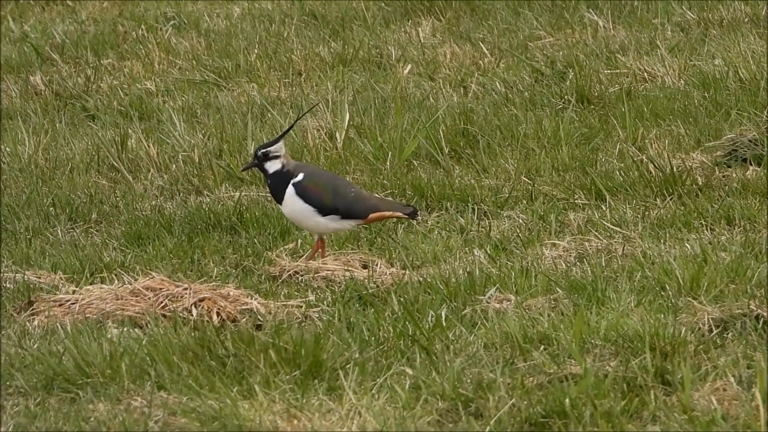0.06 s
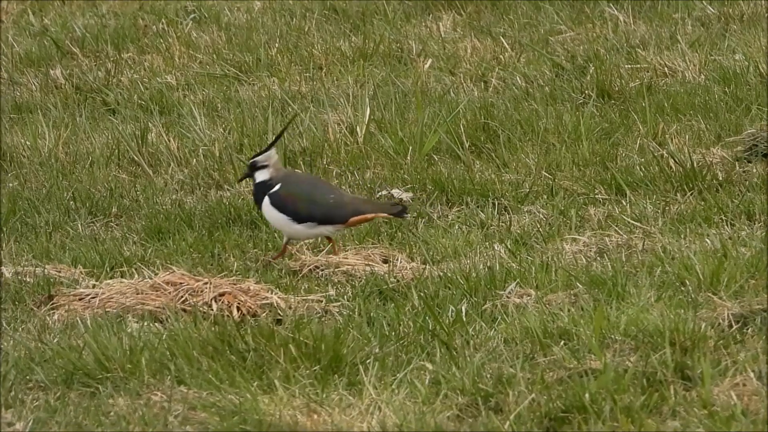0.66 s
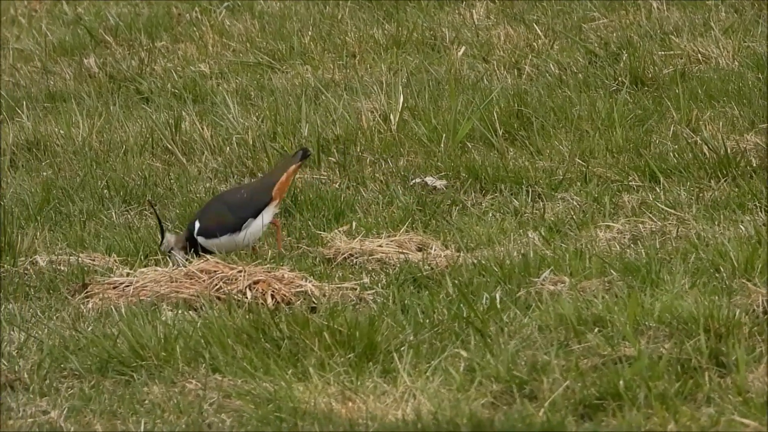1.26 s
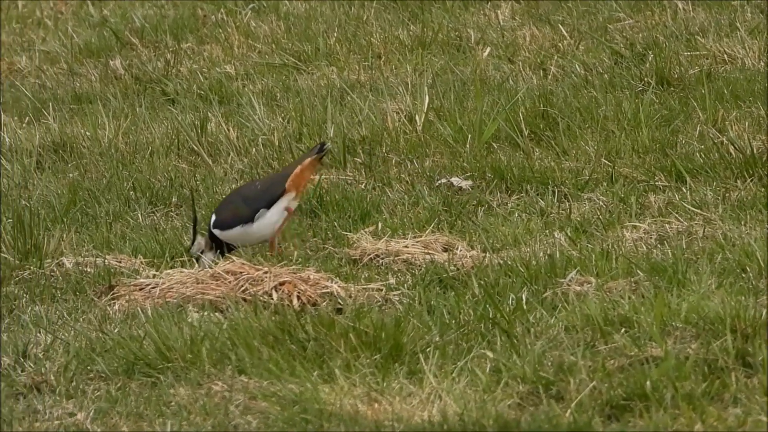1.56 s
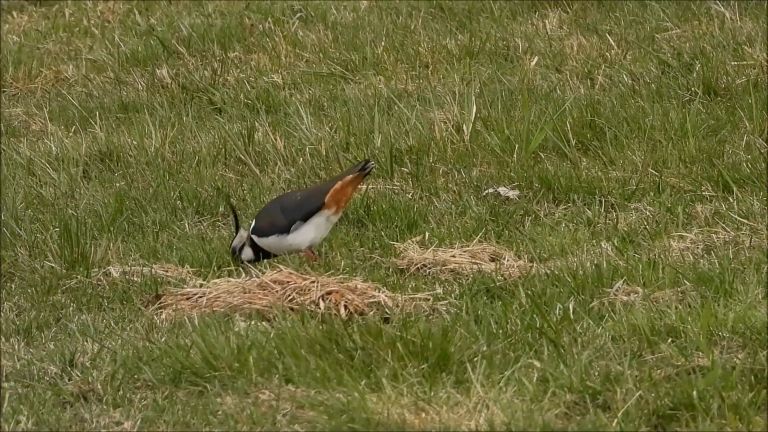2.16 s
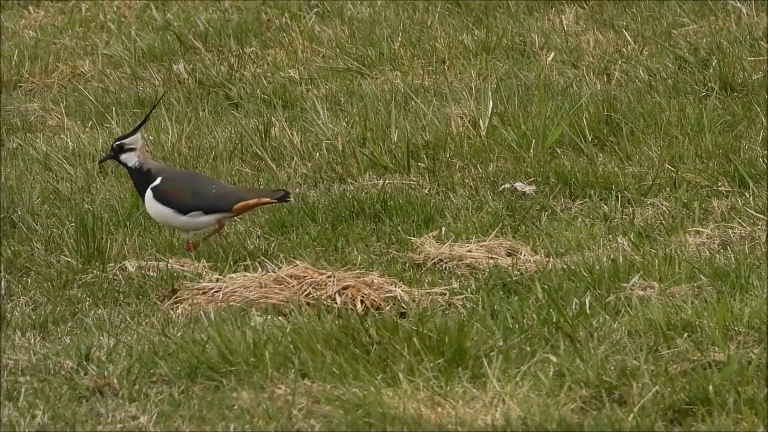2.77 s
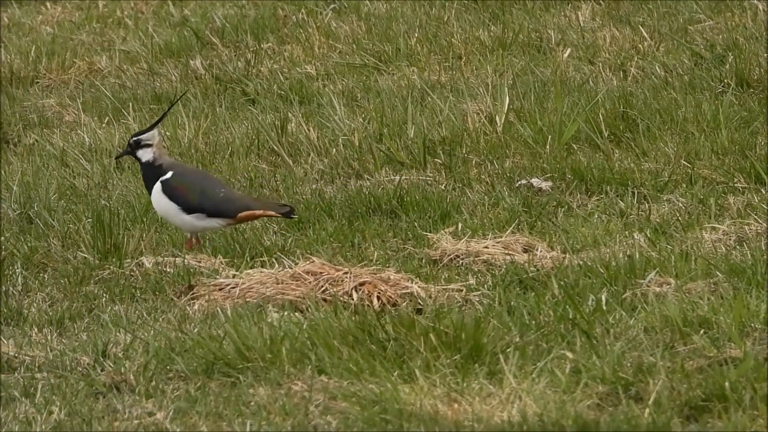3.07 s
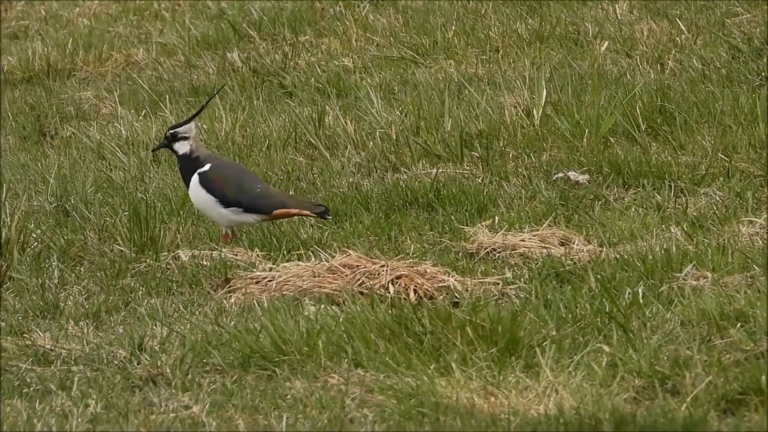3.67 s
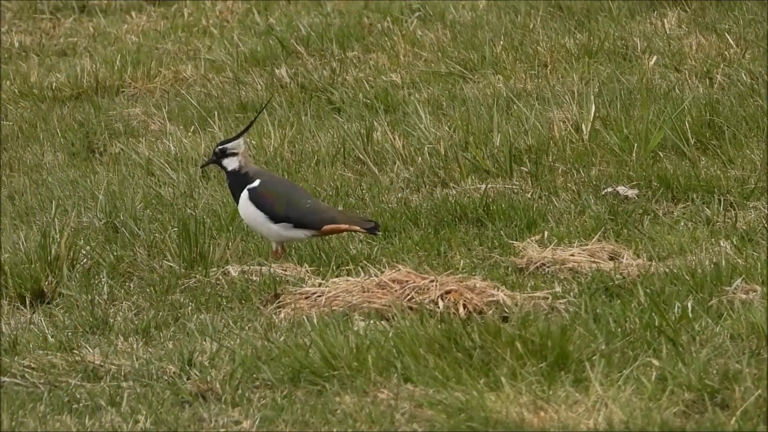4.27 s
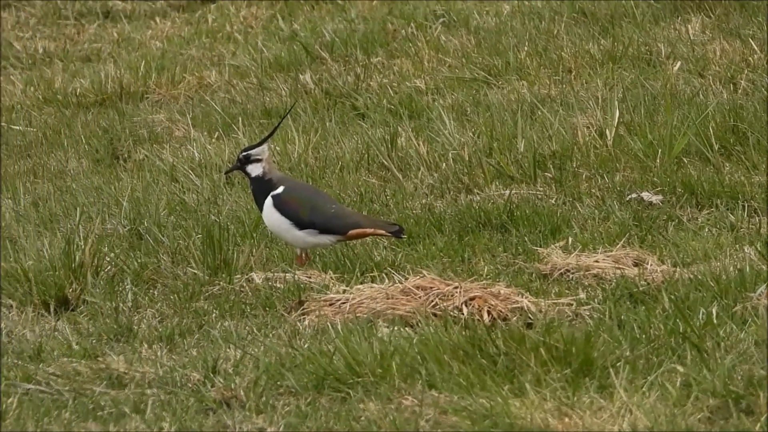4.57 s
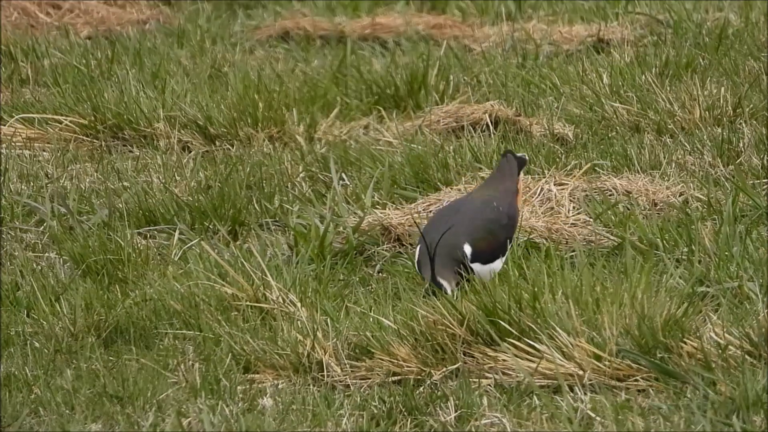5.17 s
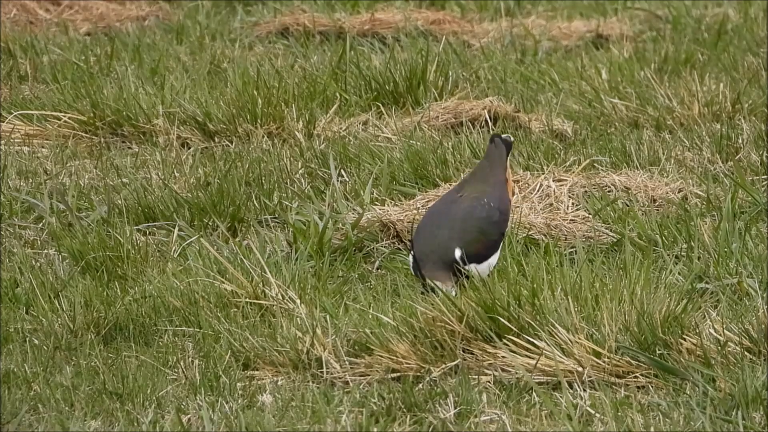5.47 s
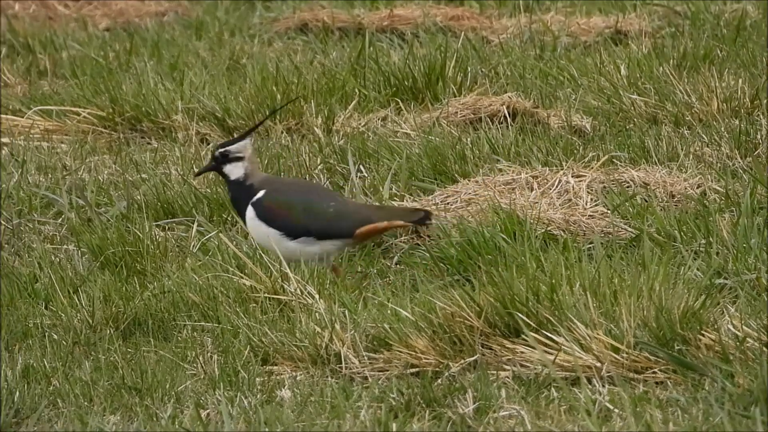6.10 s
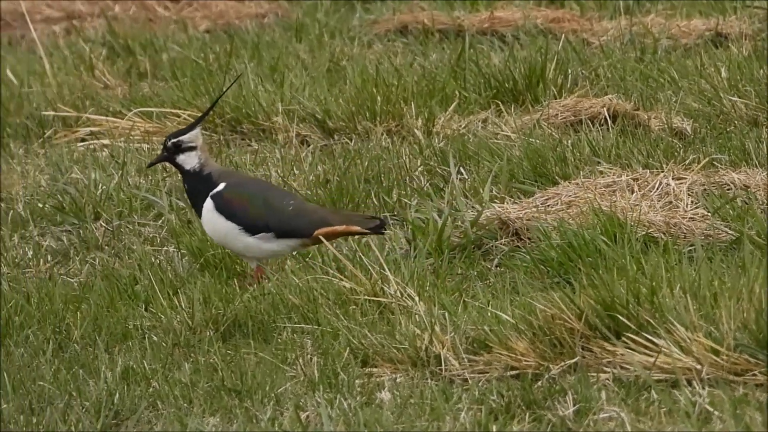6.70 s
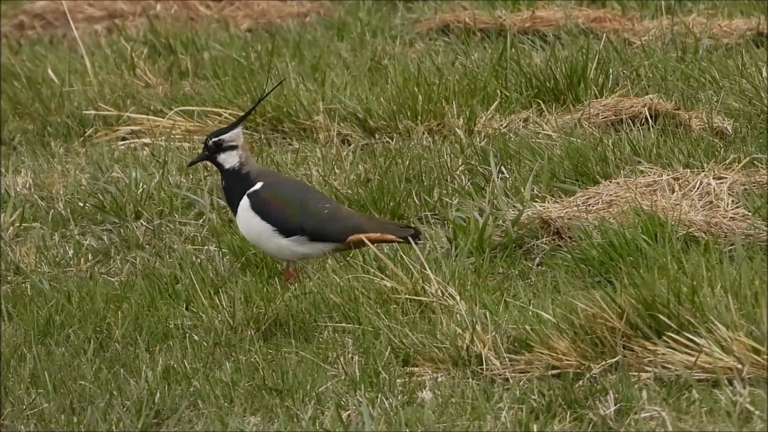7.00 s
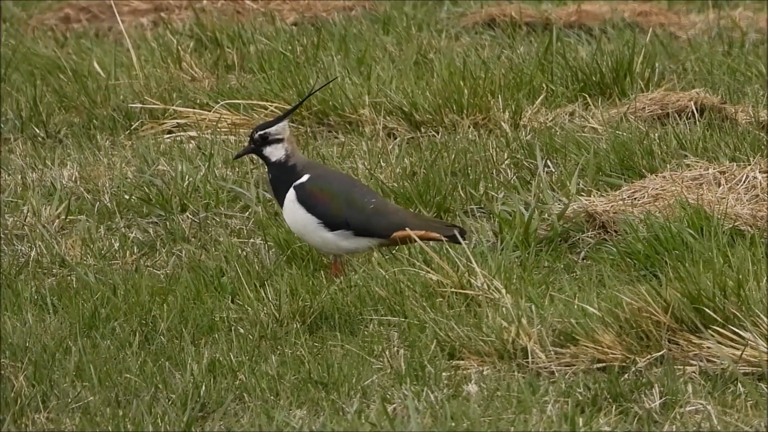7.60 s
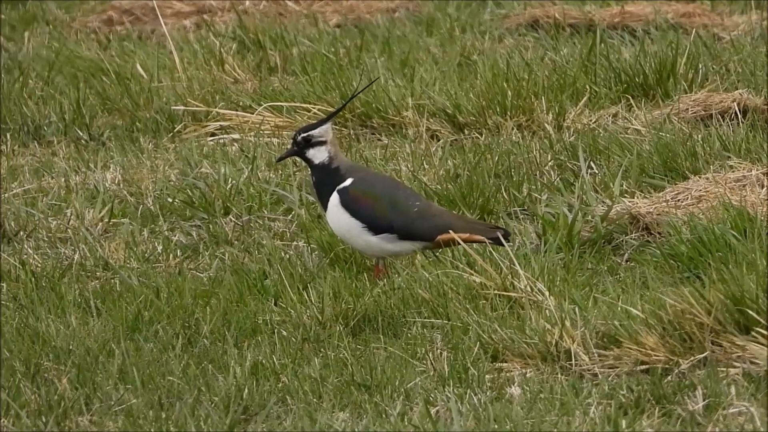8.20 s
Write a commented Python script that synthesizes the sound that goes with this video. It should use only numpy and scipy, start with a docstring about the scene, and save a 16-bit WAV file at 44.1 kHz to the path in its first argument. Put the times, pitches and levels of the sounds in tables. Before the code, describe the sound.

Faint, quick chirps and trills of small birds outdoors, cutting out for an instant, then continuing as wind buffets the microphone.

```python
"""Small birds twitter over an open meadow: whistles, buzzy trills and slurs, from two places in turn.
The first is calm; after a moment of silence the second fades in, with wind rumbling on the microphone.
Each bird's syrinx makes one tone, modulated in pitch and strength and scattered by grass and bushes.
A soft bubbling drone goes on throughout, and there are a few dry ticks and bumps."""
import sys
import numpy as np
from scipy import signal
from scipy.fft import rfft, irfft, next_fast_len
from scipy.io import wavfile
from scipy.ndimage import uniform_filter1d, map_coordinates

SR = 44100
rng = np.random.default_rng(int(sys.argv[2]) if len(sys.argv) > 2 else 0)


def master(y):
    """Save y as 16-bit WAV."""
    cut = np.clip(np.atleast_2d(y).T, -1, 1)
    pcm = np.round(cut * 32767)  # scale
    wavfile.write(sys.argv[1], SR, pcm.astype(np.int16))


N = 372644
TIME = np.arange(N) / SR
FIRST_ENDS_S, SECOND_BEGINS_S, SECOND_OPEN_S = 4.862, 4.925, 5.2  # the two places


def amp(db):
    """Decibels to amplitude ratio."""
    return 10 ** (np.asarray(db) / 20)


def unit(x):
    """Normalisation to rms 1."""
    return x / np.sqrt(np.mean(x ** 2) + 1e-20)


def along(points, hz):
    """Interpolation of (frequency_hz, value) points on a logarithmic axis."""
    f, v = np.transpose(points)
    return np.interp(np.log(hz + 1), np.log(f + 1), v)


def curve(rows):
    """Linear interpolation of (time_s, value) rows at every sample."""
    return np.interp(TIME, *np.transpose(rows))


def wobble(per_s, size=N):
    """Smooth random modulation: a spline through Gaussian knots."""
    knots = rng.standard_normal(int(size * per_s / SR) + 4)
    return map_coordinates(knots, [np.arange(size) * per_s / SR])


def phase_of(hz):
    """Phase in radians is the integral of frequency."""
    return 2 * np.pi * np.cumsum(hz) / SR


def filtered(x, response):
    """Linear filtering: the spectrum times a frequency response."""
    size = next_fast_len(N + SR // 2)
    return irfft(rfft(x, size) * response(np.fft.rfftfreq(size, 1 / SR)), size)[..., :N]


def noise(spectrum):
    """Spectral shaping of white noise, at rms 1."""
    return unit(filtered(rng.standard_normal(N), lambda hz: amp(along(spectrum, hz))))


def rush(spectrum, coherence, patchy_db):
    """Stereo noise with patches of random gain; the mid-to-side ratio sets interaural coherence."""
    def mid_and_side(hz):
        angle = np.arccos(np.clip(along(coherence, hz), -1, 1)) / 2
        return amp(along(spectrum, hz)) * np.array([np.cos(angle), np.sin(angle)])
    cells = signal.stft(rng.standard_normal((2, N)), nperseg=512)[2]
    patches = uniform_filter1d(rng.standard_normal(cells.shape[1:]), size=4, axis=0)
    patches = unit(uniform_filter1d(patches, size=8, axis=1))
    pair = signal.istft(cells * amp(patchy_db * patches), nperseg=512)[1][:, :N]
    mid, side = filtered(pair, mid_and_side)
    return unit(np.array([mid + side, mid - side]))


def add(track, start_s, sound):
    """Superposition of a sound on the track."""
    part = track[round(start_s * SR):][:len(sound)]
    part += sound[:len(part)]


def scatter(x, t60_s):
    """Diffuse reflection from grass and bushes: convolution with decaying noise, one tail per ear."""
    t = np.arange(SR // 2) / SR
    tail = rng.standard_normal((2, len(t))) * amp(-60 * t / t60_s)
    return signal.fftconvolve(x[None], tail / np.linalg.norm(tail[0]), axes=1)[:, :N]


def add_blurred(track, start_s, note, blur):
    """Multipath arrival: the share blur of a note's energy comes as echoes."""
    direct, echoes = note
    add(track, start_s, np.sqrt(1 - blur) * direct)
    add(track, start_s, np.sqrt(blur) * echoes)


def air():
    """The meadow's hush: broadband noise, partly coherent between the ears."""
    # still air at the first and second place: frequency_hz, density_db
    calm_spectrum = [(25, -50), (80, -33), (120, -25.5), (170, -1), (400, -2), (650, -2), (1100, -3),
                     (2200, -4.5), (4500, -6), (6300, -9), (8500, -20), (12000, -28), (15000, -52)]
    open_spectrum = [(100, -2), (600, 2), (1100, -3), (2200, -5.5), (4500, -9.5), (6300, -11.5),
                     (8500, -21.5), (13700, -30.5), (15500, -25)]
    # left-right likeness at each place: frequency_hz, coherence
    calm_coherence = [(130, 0.5), (640, 0.014), (1400, 0.33), (3100, -0.0034), (6800, -0.27), (15000, 0.3)]
    open_coherence = [(300, 0.99), (1200, 0.19), (4000, 0.48), (8000, 0.056), (14500, 0.94)]
    first = amp(-63) * rush(calm_spectrum, calm_coherence, patchy_db=3.5)
    second = amp(-62) * rush(open_spectrum, open_coherence, patchy_db=3)
    return np.where(TIME < FIRST_ENDS_S, first, second)


def far_chorus():
    """Many far birds sum incoherently to a flickering band of noise."""
    # band of the twitter: frequency_hz, density_db
    spectrum = [(1800, -37), (2600, -19), (3300, -19), (4500, 7), (5500, -2), (6800, -29.5)]
    # its course at the first place: time_s, relative_db
    course = [(0, -67), (.9, -66.5), (1.5, -70), (1.95, -65), (2.3, -64), (3.5, -66.5), (4.1, -73),
              (4.85, -70)]
    level_db = np.where(TIME < FIRST_ENDS_S, curve(course) - 4, -71)
    return amp(level_db) * rush(spectrum, coherence=[(4000, 0)], patchy_db=3)


def far_song(level_db=-72, count=170):
    """Short gliding notes from far singers, heard only as a reverberant field."""
    song = np.zeros(N)
    for when, length, pitch, slope, strength in rng.random((count, 5)):
        hz = 2700 + 2800 * pitch
        turn = 0.305 * (slope - .5)
        contour = glide(0.0151 + .05 * length, hz * (1 + turn), hz, hz * (1 - turn))
        add(song, when * N / SR, syrinx(contour, .5 + strength, rough=0.32))
    return amp(level_db) * unit(scatter(song, t60_s=0.29))


def hiss(level_db=-86):
    """Thin, high band noise at the second place."""
    # the hiss: frequency_hz, density_db
    spectrum = [(12500, -45), (13900, -14), (14250, -5), (14700, 7), (15500, -8)]
    return amp(level_db) * noise(spectrum) * (TIME > FIRST_ENDS_S)


def hum(level_db=-69):
    """A faint hum of low band noise; its envelope rises once and sinks to a low, steady level."""
    envelope = curve([(.55, 0), (.85, 0.71), (1.25, 0.61), (1.55, 0.19)])
    spectrum = [(120, -36), (200, -1.5), (300, -8.5), (380, 5), (480, -8), (620, -23), (1200, -54)]
    return amp(level_db) * envelope * noise(spectrum)


def drone_voice(resonances, swells, pitch_hz, murmur_db, tone_share=.35):
    """A wavering tone plus resonant noise; swells add in power to a murmur set for each place."""
    def response(hz):
        return sum(amp(db) / (1 + ((hz - centre) / (0.6 * width)) ** 4)
                   for centre, width, db in resonances)
    power = amp(np.where(TIME < FIRST_ENDS_S, *murmur_db)) ** 2
    for middle_s, length_s, db in swells:
        power += (amp(db) * np.cos(np.pi * np.clip((TIME - middle_s) / length_s, -.5, .5))) ** 2
    coo = np.sin(phase_of(pitch_hz * (1 + .035 * wobble(16))))
    coo = unit(coo * amp(3 * wobble(22)))
    breath = unit(filtered(rng.standard_normal(N), response))
    return np.sqrt(power) * (np.sqrt(tone_share) * coo + np.sqrt(1 - tone_share) * breath)


def drone():
    """Soft bubbling, perhaps a distant animal chorus: two amplitude-modulated voices swell in turn."""
    # resonances of each voice: centre_hz, width_hz, gain_db
    upper_modes = [(829.3, 45, 0), (881.7, 64, -2.5), (1364, 64, -13.5), (1593, 104, -16)]
    lower_modes = [(748, 53, 0)]
    # swells of each voice: middle_s, length_s, level_db
    upper_swells = [(0.05, 0.039, -55.5), (0.208, 0.11, -63), (0.55, 0.058, -59.5), (0.811, 0.049, -62.5),
                    (1.302, 0.25, -62.5), (1.469, 0.14, -60), (1.63, 0.25, -64.5), (2.423, 0.16, -60.5),
                    (3.56, 0.21, -63), (4.416, 0.11, -62), (4.73, 0.43, -62), (5.517, 0.2, -57.5),
                    (5.839, 0.2, -62), (6, 0.18, -58.5), (6.2, 0.18, -58.5), (6.526, 0.78, -59),
                    (6.905, 0.15, -60.5), (7.322, 0.16, -58.5), (7.643, 0.44, -60.5), (7.884, 0.14, -58.5),
                    (8.21, 0.62, -64.5), (8.39, 0.074, -56.5)]
    lower_swells = [(0.41, 0.085, -66), (0.557, 0.12, -62.5), (1.13, 0.14, -69), (1.971, 0.46, -67),
                    (2.752, 0.15, -63), (3.202, 0.28, -63), (3.757, 0.65, -67.5), (5.632, 0.28, -65.5),
                    (6.291, 0.21, -62.5), (6.55, 0.39, -66), (7.49, 0.11, -63)]
    upper = drone_voice(upper_modes, upper_swells, pitch_hz=855.3, murmur_db=(-67.5, -64.5))
    lower = drone_voice(lower_modes, lower_swells, pitch_hz=749, murmur_db=(-73, -75))
    return amp(1) * upper + lower


def wind(gain_db=0.5, onset_db_per_s=260, buffet_db=1):
    """Turbulent pressure: eddies buffet the microphone at the second place, alike in both ears."""
    # gusts: time_s, strength_db
    gusts = [(5.2, -46), (5.45, -50), (5.74, -45.5), (5.76, -51), (6.06, -41.5), (6.13, -50.5), (6.22, -41),
             (6.35, -47), (6.65, -37), (6.98, -41), (7.01, -34), (7.16, -40.5), (7.2, -34), (7.33, -43),
             (7.36, -37.5), (7.64, -47.5), (7.68, -42), (7.71, -52), (7.75, -35), (7.88, -45.5),
             (7.91, -37.5), (7.99, -44.5), (8.27, -38.5), (8.45, -41)]
    # rumble of the eddies: frequency_hz, density_db
    spectrum = [(12, -47), (25, -12.5), (45, -1.5), (72, 0.5), (98, 4), (125, 0.5), (160, -4), (250, -14),
                (400, -25), (700, -48.5), (1500, -91)]
    eddies = noise(spectrum)
    running_rms = np.sqrt(np.abs(uniform_filter1d(eddies ** 2, size=SR // 10)))
    rumble = unit(eddies / (running_rms + 0.11))  # evened out, so the gusts set the slow swells
    fade_db = onset_db_per_s * np.minimum(TIME - gusts[0][0], 0)
    level_db = curve(gusts) + fade_db + gain_db + buffet_db * wobble(18)
    return (TIME > SECOND_BEGINS_S) * amp(level_db) * rumble


def bumps():
    """Dull, brief rubs near the microphone: friction noise under smooth envelopes."""
    # rubs: start_s, level_db, length_s
    rubs = [(0.03, -65, 0.055), (0.583, -65, 0.054), (2.112, -53.5, 0.076), (2.16, -61, 0.084),
            (2.295, -65, 0.07), (2.917, -70, 0.07), (5.17, -47.5, 0.11), (6.479, -53, 0.075),
            (6.847, -46, 0.035)]
    # their timbre: frequency_hz, density_db
    spectrum = [(30, -30), (100, -30), (160, -10.5), (215, 7), (300, 0.5), (500, -6), (800, -19.5),
                (2000, -23.5), (8000, -62)]
    envelope = np.zeros(N)
    for start_s, db, length_s in rubs:
        add(envelope, start_s, amp(db) * np.hanning(int(length_s * SR)))
    return envelope * noise(spectrum)


def rustle(start_s=.757, length_s=.04, level_db=-68.5):
    """One burst of high noise, uncorrelated between the ears."""
    # the rustle: frequency_hz, density_db
    spectrum = [(3000, -27), (6500, -3), (11000, 7), (13000, -8), (15500, -15)]
    envelope = np.zeros(N)
    add(envelope, start_s, np.hanning(int(length_s * SR)))
    return amp(level_db) * envelope * np.array([noise(spectrum), noise(spectrum)])


def ticks(crack_t60_s=0.042, attack_s=0.001):
    """Each dry tick is a noise transient with one damped mode, thinned by a band-pass."""
    # ticks: start_s, level_db, ring_hz, ring_t60_s, crack_relative_db, crack_cutoff_hz
    events = [(2.172, -51.5, 7140, 0.019, -4, 7500), (3.684, -46.5, 6150, 0.028, -2, 8000),
              (5.965, -45.5, 6000, .019, -9, 7000), (8.1677, -30.5, 4470, 0.017, -28, 12000)]
    out, t = np.zeros((2, N)), np.arange(SR // 10) / SR
    for start_s, db, hz, t60_s, crack_db, cutoff_hz in events:
        ring = np.sin(2 * np.pi * hz * t) * amp(-60 * t / t60_s) * (1 - np.exp(-t / 0.00042))
        envelope = amp(crack_db - 60 * t / crack_t60_s) * (1 - np.exp(-t / attack_s))
        common = rng.standard_normal(len(t))
        soften = signal.butter(4, cutoff_hz, fs=SR, output="sos")
        for ear in out:
            crack = envelope * (common + 2 * rng.standard_normal(len(t)))
            add(ear, start_s, amp(db) * (ring + signal.sosfilt(soften, crack)))
    return filtered(out, lambda hz: (1j * hz / (1500 + 1j * hz)) ** 2 / (1 + 1j * hz / 9000) ** 2)


def syrinx(hz, gain, rough=0, rasp_hz=600, waver=0.0044, flutter_db=1.66, edge_s=0.0026):
    """A bird's tone; random modulation moves the share rough of its power into a band rasp_hz wide."""
    size = len(hz)
    phase = phase_of(hz * (1 + waver * wobble(303, size)))
    ends = signal.windows.tukey(size, min(1, 2 * edge_s * SR / size))
    sidebands = wobble(rasp_hz, size) + 1j * wobble(rasp_hz, size)
    smear = np.sqrt(1 - rough) + np.sqrt(rough / 2) * sidebands
    flutter = amp(flutter_db * wobble(111.6, size))
    return np.sqrt(2) * gain * ends * flutter * np.imag(smear * np.exp(1j * phase))


def glide(length_s, start_hz, middle_hz, end_hz):
    """A parabolic pitch contour through three points."""
    parabola = np.polyfit([0, .5, 1], [start_hz, middle_hz, end_hz], 2)
    return np.polyval(parabola, np.linspace(0, 1, int(length_s * SR)))


def bend(length_s, start_hz, end_hz, done_by_middle=0.63):
    """A pitch contour that moves quickly at first, then settles."""
    return glide(length_s, start_hz, start_hz + done_by_middle * (end_hz - start_hz), end_hz)


def effort(size):
    """A note's amplitude envelope: fullest past the middle, then easing off."""
    return amp(np.interp(np.linspace(0, 1, size), [0, .3, .75, 1], [-6, -1, 0, -2]))


def pulses(beat, depth):
    """Periodic amplitude modulation at rms 1, one pulse per cycle of the phase beat."""
    return unit((1 - depth * np.cos(beat / 2) ** 2) ** 2)


def faint_trills(level_db=-72, low_hz=2600, high_hz=5600, count=12):
    """Rows of weak neighbours' trills at the first place, log-uniform in pitch."""
    rows = []
    for when, length, pitch, slope, rate in rng.random((count, 5)):
        hz = low_hz * (high_hz / low_hz) ** pitch
        start_s, length_s = when * (FIRST_ENDS_S - .2), 0.052 + .09 * length
        rows.append((start_s, length_s, hz * (1 + 0.16 * slope), hz, 35 + 30 * rate, level_db))
    return rows


def wavering():
    """Slow frequency modulation: one unbroken whistle arches, dips and climbs again."""
    # the whistle's contour: time_s, pitch_hz, level_db
    contour = [(5.348, 3330, -74), (5.385, 3750, -63.5), (5.425, 3970, -66), (5.485, 3740, -64),
               (5.515, 3360, -61), (5.54, 2870, -67), (5.562, 2690, -70), (5.595, 2930, -69),
               (5.635, 3290, -62.5), (5.71, 3410, -64.5), (5.738, 3130, -67)]
    at, hz, db = np.transpose(contour)
    t = np.arange(at[0], at[-1], 1 / SR)
    smooth_hz = uniform_filter1d(np.interp(t, at, hz), size=SR // 60)
    song = np.zeros(N)
    add(song, at[0], syrinx(smooth_hz, amp(np.interp(t, at, db)), rough=.15, waver=.007))
    return song


def rattle(arches_per_s=103.5, pitch_dip=.2, echo_db=-5):
    """Frequency switching: the voice leaps between a high and a low arch while both sink."""
    # tops of the arches: time_s, high_hz, low_hz, level_db
    contour = [(6.397, 4750, 3550, -66), (6.44, 4200, 3430, -56), (6.48, 3750, 3300, -59),
               (6.52, 3400, 3000, -61.5), (6.6, 3040, 2650, -66)]
    at, high_hz, low_hz, db = np.transpose(contour)
    t = np.arange(at[0], at[-1], 1 / SR)
    beats = (t - at[0]) * arches_per_s
    arch = np.abs(np.sin(np.pi * beats))
    top_hz = np.where(beats % 2 < 1, np.interp(t, at, high_hz), np.interp(t, at, low_hz))
    hz = top_hz * (1 - pitch_dip * (1 - arch))
    song = np.zeros(N)
    add(song, at[0], syrinx(hz, amp(np.interp(t, at, db)) * arch, rough=.06))
    return song + amp(echo_db) * scatter(song, t60_s=0.055)[0]


def rasps(throb_hz=75, depth=0.39):
    """Hoarse sweeps: narrow-band noise with uneven amplitude modulation."""
    # sweeps: start_s, length_s, start_hz, end_hz, level_db
    notes = [(0.385, .075, 4700, 3900, -61.5), (.45, 0.057, 4200, 4250, -64),
             (0.842, 0.068, 4980, 4360, -58.5), (1.03, 0.16, 5550, 5650, -66),
             (1.342, .06, 4600, 4950, -64), (1.686, 0.089, 5700, 5320, -64),
             (1.818, .07, 5800, 5850, -61.5), (1.925, .05, 3700, 2810, -62),
             (2.03, 0.041, 4250, 3800, -58.5), (2.072, 0.084, 5500, 5350, -55.5),
             (2.179, 0.064, 4430, 2700, -59), (2.528, 0.056, 4710, 3190, -57.5),
             (2.599, 0.057, 2400, 2270, -64), (2.725, 0.088, 4500, 3690, -59),
             (3.118, 0.051, 3500, 2720, -59), (3.848, 0.046, 5090, 5020, -53),
             (3.958, 0.027, 4900, 3510, -51.5), (4.083, 0.018, 3900, 2700, -62),
             (4.717, 0.042, 5000, 5000, -51), (5.42, 0.045, 3400, 2950, -66),
             (5.885, 0.078, 4600, 4850, -64)]
    song = np.zeros(N)
    for start_s, length_s, start_hz, end_hz, db in notes:
        hz = bend(length_s, start_hz, end_hz)
        beat = phase_of(throb_hz * (1 + 0.22 * wobble(40, len(hz))))
        throb = unit(1 + depth * np.sin(beat))
        add(song, start_s, syrinx(hz, amp(db) * throb * effort(len(hz)), rough=0.84, rasp_hz=1099))
    return song


def trills(slow_fast_hz=(44, 94), uneven=0.114):
    """Coupled amplitude and frequency modulation: each pulse sweeps down, more deeply in slow trills."""
    # buzzy notes: start_s, length_s, start_hz, end_hz, pulse_rate_hz, level_db
    notes = [(0, .23, 4530, 4360, 54, -58.5), (0.01, 0.039, 2950, 2620, 62, -60),
             (0.106, 0.14, 5180, 5630, 29, -62), (.443, 0.044, 3800, 3390, 64, -59.5),
             (0.996, 0.2, 3480, 3420, 28, -68), (1.689, 0.093, 5020, 4700, 50, -54.5),
             (1.703, 0.19, 3160, 3300, 39, -68), (1.935, 0.039, 2770, 2570, 44, -64),
             (2.013, 0.063, 4670, 5060, 69, -52.5), (2.221, .1, 2800, 2690, 58, -68),
             (2.455, 0.039, 4850, 4000, 56, -54), (2.608, 0.058, 4760, 4180, 57, -56.5),
             (2.666, .037, 4700, 5000, 80, -54), (2.768, .092, 4300, 3260, 48, -60),
             (2.921, 0.027, 4230, 4510, 65, -47), (3.616, 0.016, 3260, 3240, 66, -52.5),
             (3.668, .082, 3080, 2670, 45, -64), (3.774, 0.2, 2880, 2850, 52, -67.5),
             (3.993, 0.036, 3250, 3050, 70, -54), (4.057, .045, 3210, 2750, 51, -63.5),
             (4.241, 0.044, 5300, 5650, 67, -52.5), (4.674, 0.097, 3530, 2890, 71, -61.5),
             (6.29, 0.093, 3400, 3260, 86, -66), (6.75, 0.042, 4330, 4090, 79, -53.5)]
    song = np.zeros(N)
    for start_s, length_s, start_hz, end_hz, rate_hz, db in notes + faint_trills():
        hz = bend(length_s, start_hz, end_hz)
        depth = np.interp(rate_hz, slow_fast_hz, [0.79, 0.29])
        sweep = np.interp(rate_hz, slow_fast_hz, [0.0755, 0.017])
        beat = phase_of(rate_hz * (1 + uneven * wobble(33.1, len(hz))))
        blur = np.interp(db, [-64, -47], [0.5, 0.3])  # faint, far trills carry more echo
        gain = amp(db) * pulses(beat, depth) * effort(len(hz))
        note = syrinx(hz * (1 + sweep * np.sin(beat)), gain, rough=blur / 2)
        add_blurred(song, start_s, (note, scatter(note, t60_s=0.053)[0]), blur)
    return song


def buzzes():
    """Periodic modulation: a near bird's tone quavers in pitch and strength, swells, then holds."""
    # start_s, length_s, start_hz, middle_hz, end_hz, beat_hz, pulse_depth, sweep_share, level_db
    notes = [(3.109, 0.22, 3570, 3424, 3365, 91, 0.6, 0.022, -50),
             (3.428, 0.1, 4760, 4490, 4170, 91, .3, .022, -49.5),
             (3.816, .09, 4500, 4950, 4840, 91, .25, 0.028, -46),
             (4.325, 0.2, 4720, 4430, 4326, 83, .2, .03, -49)]
    song = np.zeros(N)
    for start_s, length_s, *contour_hz, beat_hz, depth, sweep, db in notes:
        hz = glide(length_s, *contour_hz)
        beat = 2 * np.pi * beat_hz * np.arange(len(hz)) / SR
        rise_db = np.interp(np.linspace(0, 1, len(hz)), [0, 0.34], [-9, 0])
        gain = amp(db + rise_db) * pulses(beat, depth)
        add(song, start_s, syrinx(hz * (1 + sweep * np.sin(beat)), gain, rough=.03, flutter_db=.9))
    return song


def whistles():
    """Single frequency glides, pure to husky; at the first place echoes blur the faint, far ones."""
    # whistled notes: start_s, length_s, start_hz, middle_hz, end_hz, level_db, rough_share
    notes = [(0.342, 0.12, 3720, 3730, 3820, -66.5, 0.1), (.472, 0.098, 3400, 3290, 3205, -58.5, .08),
             (0.573, 0.032, 3150, 3000, 2840, -62, 0.3), (0.614, 0.032, 3120, 2920, 2800, -63, 0.3),
             (0.661, 0.029, 2930, 2760, 2740, -64.5, 0.2), (1.06, 0.046, 4400, 4940, 5200, -61, 0.1),
             (1.168, 0.1, 5390, 5310, 5180, -60.5, .02), (1.314, 0.042, 4020, 4280, 4580, -60, 0),
             (1.567, 0.053, 5200, 5040, 4960, -48, 0.06), (1.644, 0.034, 3530, 3440, 3380, -53.5, 0.3),
             (1.837, 0.043, 5380, 5270, 5270, -49, .03), (1.88, 0.026, 4190, 4350, 4630, -54.5, .15),
             (1.915, 0.019, 4300, 4180, 4000, -52, 0.1), (1.93, 0.047, 4260, 4250, 4250, -56, 0),
             (1.977, 0.025, 3160, 3180, 3110, -51.5, 0.03), (2.09, 0.077, 3750, 3740, 3720, -66, .05),
             (2.222, 0.063, 2500, 2490, 2450, -65, .05), (2.273, .045, 2130, 2050, 2030, -66.5, .1),
             (2.367, 0.029, 5100, 5190, 5400, -51.5, .2), (2.407, 0.042, 6200, 5660, 5180, -55, .25),
             (2.734, 0.055, 4910, 5200, 4860, -46, 0.02), (2.977, 0.025, 5100, 5330, 5500, -43, .08),
             (2.999, 0.022, 5100, 5280, 5420, -46.5, .15), (3.051, 0.032, 4120, 4216, 4220, -45.5, 0.17),
             (3.085, 0.02, 4380, 4720, 4500, -51.5, 0.4), (3.529, 0.032, 4140, 4025, 3870, -46.5, 0.06),
             (4.366, 0.075, 5200, 4920, 4550, -50, .01), (4.726, 0.034, 4940, 4170, 4780, -47.5, .3),
             (4.768, 0.028, 5830, 5460, 5260, -43.5, 0.1), (4.826, 0.028, 4360, 4360, 4120, -41.5, 0.02),
             (5.531, 0.071, 4020, 3600, 4060, -66, .1), (5.578, .065, 4450, 4270, 4200, -68, .4),
             (6.023, 0.023, 6420, 6320, 6150, -62.5, .1), (6.124, .018, 6300, 6200, 6060, -68, 0.06),
             (6.703, .02, 4400, 3900, 3350, -62, .2), (6.755, .06, 5430, 5380, 5270, -66, .2),
             (6.898, .032, 4600, 4420, 4390, -61, .1), (6.957, 0.018, 4620, 4780, 5080, -59, .1),
             (7.153, 0.022, 4520, 4720, 5000, -53, 0.2), (7.25, .14, 5100, 5200, 5350, -68, .4),
             (7.369, .02, 4620, 4780, 5130, -56, 0.25), (7.393, .06, 4520, 4460, 4380, -64, 0),
             (7.589, 0.022, 4520, 4650, 4900, -60, .1), (7.883, 0.079, 5560, 5560, 5600, -56, 0),
             (7.964, 0.027, 5480, 5320, 5000, -56.5, 0), (8, .22, 5850, 5300, 4960, -68.5, .5),
             (8.383, .074, 6150, 5580, 5500, -68.5, .03)]
    song = np.zeros(N)
    for start_s, length_s, *contour_hz, db, rough in notes:
        hz = glide(length_s, *contour_hz)
        note = syrinx(hz, amp(db) * effort(len(hz)), rough=rough, rasp_hz=903)
        blur = (start_s < FIRST_ENDS_S) * np.interp(db, [-62, -50], [.45, 0])
        add_blurred(song, start_s, (note, scatter(note, t60_s=.12)[0]), blur)
    return song


def syllables():
    """Recurring calls: each repeat is its contour transposed and scaled in time."""
    # contours: offset_s, pitch_hz, relative_db
    slur = [(0, 3970, 0), (.004, 3936, 0.5), (.015, 3876, -0.5), (.028, 3183, -3.5), (.043, 2790, -4.5),
            (.069, 2660, -8.5), (.128, 2602, -6.5), (.146, 2505, -10)]  # drops and holds
    fall = [(0, 6640, -11), (.035, 5800, -9), (.085, 5350, -14), (.115, 5210, -4.5), (.165, 5050, -1),
            (.2, 4830, 1)]  # sinks as it swells
    arch = [(0, 3740, -8.5), (.012, 4026, -8), (.033, 4140, -4.5), (.044, 3750, -2.5), (.054, 3190, -5)]
    pip = [(0, 3450, -3.5), (.013, 4100, 0), (.026, 4430, 2)]  # rises
    peep = [(0, 3250, -6), (.004, 3370, 1), (.009, 3450, -2)]
    chip = [(0, 4334, 2), (.009, 3886, 0), (.018, 3050, -8)]  # flicks steeply down
    # repeats of each: start_s, level_db, pitch_ratio, length_ratio
    slurs = [(6.78, -53, 1.05, 0.83), (6.977, -56, 1.01, .92), (7.171, -50.5, 0.98, 1),
             (7.387, -56.5, 1.003, 1.04), (7.608, -53, 0.98, 0.98)]
    falls = [(3.238, -53.5, 1.005, 1.02), (4.218, -57, 1.02, .75)]
    arches = [(7.819, -49, 1.18, 0.5), (8.027, -49, 1.015, .99), (8.109, -56, 0.97, 1.06),
              (8.189, -52, 1, 1.1), (8.274, -52.5, 1.01, 1.06), (8.358, -52.5, 1, 1.04),
              (8.441, -48, .98, 1.1)]
    pips = [(.313, -60, 0.91, 1), (2.888, -60.5, 0.73, 1.23), (5.783, -62, 1.17, 0.77),
            (5.822, -62, 0.76, 0.7), (5.969, -55, 1, 1), (6.073, -54.5, 0.996, 0.83),
            (6.175, -59, 0.95, 1.04), (6.281, -58.5, 0.95, 0.86)]
    peeps = [(.03, -54.5, 0.87, 0.94), (2.088, -48, 1.4, 1), (2.102, -49, 1.4, 1.2),
             (2.442, -49, 1.53, 0.89), (3.639, -48.5, 0.93, 1.05), (3.667, -52, 1.22, 1),
             (3.684, -54, 1.22, 1), (3.703, -54, 1.23, 1), (3.721, -57, 1.2, 1), (7.071, -63, 1.23, 1),
             (7.087, -62, 1.1, 1), (7.103, -57, 1.09, 0.8), (7.119, -53, 1.03, 0.94),
             (7.136, -47, 0.99, 0.89), (7.153, -50.5, 0.92, 1), (7.298, -64, 1.22, 1),
             (7.334, -62, 1.27, 1), (7.688, -64, 0.91, 1.1), (7.712, -62, 0.86, 1),
             (7.846, -54, 1.38, 0.94)]
    chips = [(.882, -55, 1.14, 1.1), (3.054, -54, 0.89, 0.63), (3.606, -50, 1.07, 0.98),
             (3.907, -46, 1.1, 1.1), (3.965, -55, 0.98, 1.1), (4.608, -46.5, 1, 1.02), (4.631, -46.5, 1, 1),
             (4.654, -48, 0.96, 1.14), (4.83, -51, 0.84, 0.55), (4.842, -50, 0.94, 0.72)]
    pure = dict(rough=.004, waver=.002, flutter_db=.6)
    husky = dict(rough=.08, waver=.006)
    hoarse = dict(rough=.6, rasp_hz=800)
    song = np.zeros(N)
    for contour, calls, timbre in [(slur, slurs, pure), (fall, falls, pure), (arch, arches, husky),
                                   (pip, pips, husky), (peep, peeps, husky), (chip, chips, hoarse)]:
        at, hz, relative_db = np.transpose(contour)
        for start_s, db, pitch_ratio, stretch in calls:
            t = np.arange(int(at[-1] * stretch * SR)) / SR / stretch
            gain = amp(db + np.interp(t, at, relative_db))
            add(song, start_s, syrinx(pitch_ratio * np.interp(t, at, hz), gain, **timbre))
    return song


def birds(left_lead_s=.00008, pan_db=1.4):
    """Interaural time and level differences set the singers left at the first place, then ahead."""
    song = whistles() + wavering() + trills() + buzzes() + rasps() + rattle() + syllables()
    first, second = song * (TIME < FIRST_ENDS_S), song * (TIME >= FIRST_ENDS_S)
    ears = np.array([[1], [-1]])
    aside = amp(pan_db * ears) * filtered(first, lambda hz: np.exp(1j * np.pi * hz * left_lead_s * ears))
    ground = amp(-16) * scatter(first, t60_s=0.027)  # early reflections
    ahead = amp(-0.7) * second + amp(-16) * scatter(second, t60_s=0.076)[0]  # softened over the grass
    echoes = amp(-8) * scatter(first, t60_s=0.096) + amp(-14) * scatter(second, t60_s=0.2)
    return aside + ground + ahead + echoes


def scene():
    """Superposition of all sources; the second place's hush fades in, its treble last."""
    hush = air() + far_chorus() + far_song() + hiss()
    dull = filtered(hush, lambda hz: 1 / (1 + (hz / 7000) ** 12))
    fade = amp(curve([(FIRST_ENDS_S, 0), (SECOND_BEGINS_S, -7), (5.1, -4.5), (SECOND_OPEN_S, 0)]))
    treble = curve([(FIRST_ENDS_S, 1), (SECOND_BEGINS_S, 0), (5.1, .05), (SECOND_OPEN_S, 1)])
    background = fade * (dull + treble * (hush - dull))
    return background + birds() + ticks() + rustle() + bumps() + drone() + hum() + wind()


def record(dry, top_hz=15500):
    """Brief, deep attenuation parts the two places; a low-pass limits the bandwidth."""
    pause_db = curve([(FIRST_ENDS_S - .004, 0), (FIRST_ENDS_S + 0.024, -38),
                      (SECOND_BEGINS_S - .006, -36), (SECOND_BEGINS_S + 0.0037, 0)])
    return filtered(dry * amp(pause_db), lambda hz: hz < top_hz)


dry = scene()
out = record(dry)
master(out)
```